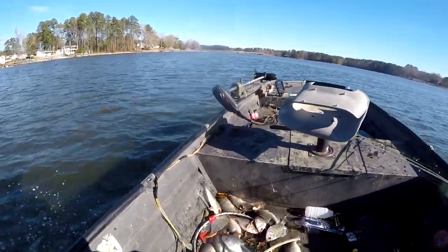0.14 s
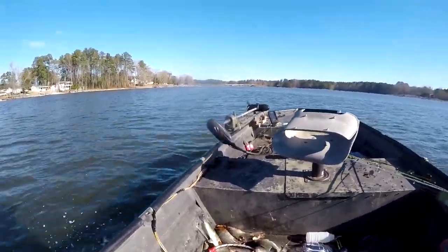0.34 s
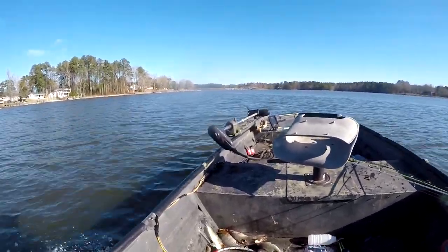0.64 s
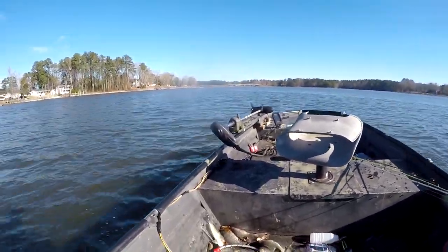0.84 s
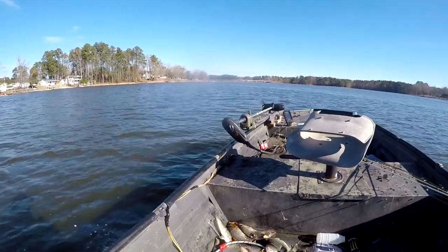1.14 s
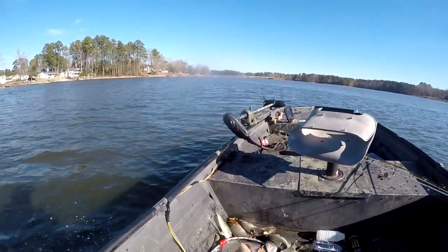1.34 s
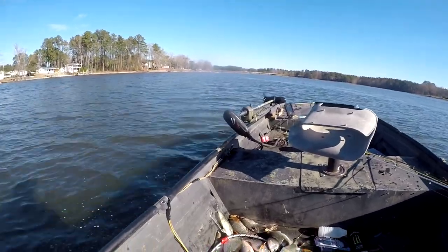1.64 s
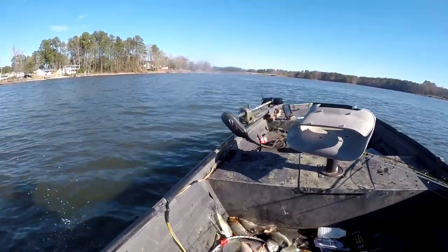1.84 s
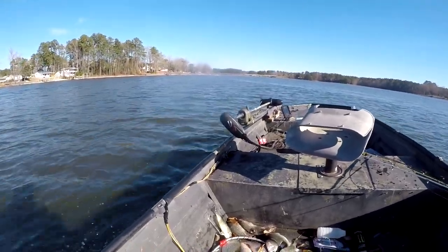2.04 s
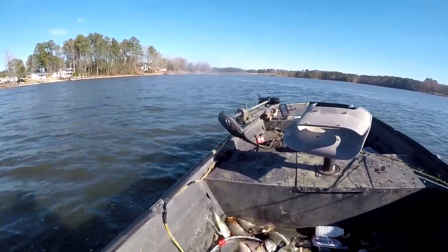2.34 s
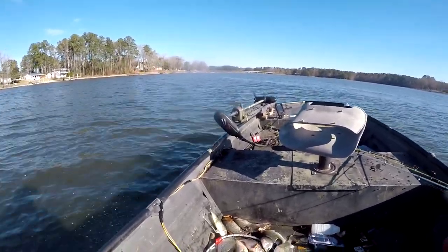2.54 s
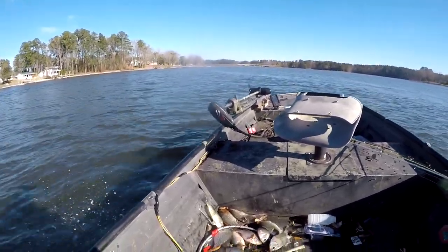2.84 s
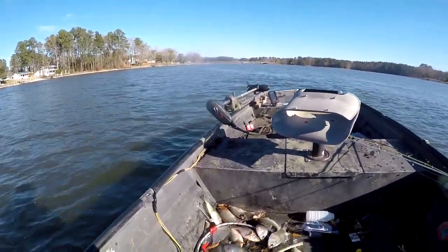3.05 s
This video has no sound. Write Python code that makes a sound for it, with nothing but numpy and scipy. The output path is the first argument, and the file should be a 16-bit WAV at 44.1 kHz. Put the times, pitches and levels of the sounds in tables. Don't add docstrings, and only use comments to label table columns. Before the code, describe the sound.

Close onboard sound of an outboard motor, buzzing and raspy at first, then its drone weakening as hull knocks crowd together, cowl clatter grows and low wind gusts hit the microphone; outdoors on a lake.

```python
import sys
import numpy as np
from scipy import signal
from scipy.fft import rfft, irfft
from scipy.io import wavfile
from scipy.ndimage import uniform_filter1d, minimum_filter1d

SR = 44100
rng = np.random.default_rng(int(sys.argv[2]) if len(sys.argv) > 2 else 0)


def gain_from_decibels(decibels):
    exponent = np.asarray(decibels, float) / 20
    return 10 ** exponent


def log_audio(samples):
    frames = np.atleast_2d(samples).T
    limited = np.clip(frames, -1, 1)
    pcm = np.round(limited * 32767).astype(np.int16)
    wavfile.write(sys.argv[1], SR, pcm)


N = 141120

# order, peak level/dB, share of the drone change, waver/dB
HUM = [
    (1, -22.5, -1.8, 4.5),
    (2, -10, 1.8, 0.66),
    (3, -28, 1.3, 2.5),
    (4, -7.5, 0.01, -0.35),
    (5, -32.5, -0.76, 0),
]
# t/s, drone change/dB, gust change/dB
TURN = [
    (0, 1.5, -1.5),
    (.35, -1, -0.5),
    (.9, .5, -0.5),
    (1.5, 0, -2.5),
    (1.75, -0.5, 1.5),
    (2.25, -1, -1),
    (2.5, -2, 2.5),
    (2.75, -3, -0.5),
    (3.2, -1.5, 2.5),
]
# t/s, exhaust change/dB, cowl change/dB
RASP = [
    (0, 2.5, -0.3),
    (.5, 2.5, -.5),
    (1, 1, -1),
    (1.7, -2, -.5),
    (2.2, 0.1, 0.2),
    (2.5, -0.5, 1.4),
    (2.7, 0.3, -0.5),
    (3.2, 0.3, 2),
]


def evened(x):
    return x / np.sqrt(np.mean(x ** 2) + 1e-20)


def curve(table, column):
    rows = np.array(table)
    return np.interp(np.arange(N) / SR, rows[:, 0], rows[:, column])


def wander(top_hz, count):
    size = N // 64 + 2
    z = rfft(rng.standard_normal((count, size)), axis=1)
    hz = np.fft.rfftfreq(size, 64 / SR)
    slow = irfft(z / (1 + (hz / top_hz) ** 2) * (hz > 0), size, axis=1)
    return np.array([evened(np.interp(np.arange(N) / 64, np.arange(size := len(s)), s)) for s in slow])


def noise(shape, patchy_db, size):
    frames, hz = N // (size // 4) + 5, np.fft.rfftfreq(size, 1 / SR)
    a, b, patches = rng.standard_normal((frames, len(hz), 3)).T
    patches = uniform_filter1d(patches, size=8, axis=0)
    patches = evened(uniform_filter1d(patches, size=8, axis=1))
    f, level = np.transpose(shape)
    colour = np.interp(np.log(hz + 1), np.log(f + 1), level, left=-100, right=-100)
    z = (a + 1j * b) * gain_from_decibels(colour[:, None] + patchy_db * patches)
    return evened(signal.istft(z, nperseg=size, noverlap=size * 3 // 4)[1][:N])


def band(lo_hz, hi_hz, count):
    sos = signal.butter(4, [lo_hz, hi_hz], "bandpass", fs=SR, output="sos")
    return evened(signal.sosfilt(sos, rng.standard_normal((count, 2000))))


def crank():
    # t/s, f/Hz (crank turns per second)
    speed = [(0, 77.6), (.35, 77.93), (.6, 78.3), (.9, 79.1), (1.2, 79.66), (1.5, 80.36), (1.75, 80.72),
             (2.0, 80.97), (2.5, 81.63), (2.95, 82.45), (3.2, 82.7)]
    start_angle, wobble_hz = 1.086, .15
    turns_per_s = curve(speed, column=1) + wobble_hz * wander(14, count=1)[0]
    return start_angle + 2 * np.pi * np.cumsum(turns_per_s) / SR


def hum(angle):
    pulse_lag = -2.8
    drone, waver = curve(TURN, column=1), wander(12, count=len(HUM))
    out = np.zeros(N)
    for (order, db, share, waver_db), w in zip(HUM, waver):
        out += gain_from_decibels(db + share * drone + waver_db * w) * np.cos(order * angle + pulse_lag)
    return out


def whine(angle):
    # order, level/dB
    orders = [(1, -10), (2, -3), (3, -18), (4, 0), (5, -23), (6, -35.5), (7, -36), (8, -36.5), (9, -33),
              (10, -38.5), (11, -41.5), (12, -42.5), (13, -49), (14, -46), (15, -46.5), (16, -42),
              (17, -48.5), (18, -38), (19, -47), (20, -41.5), (21, -53.5), (22, -40), (23, -44.5),
              (24, -43), (25, -43), (26, -55.5), (27, -49), (28, -49.5), (29, -40.5), (30, -48.5)]
    whine_db, waver_db, slip = -11, 3, .5
    upper = orders[len(HUM):]
    fade, drift = wander(8, count=2 * len(upper)).reshape(len(upper), 2, N).swapaxes(0, 1)
    start = rng.uniform(0, 2 * np.pi, len(upper))
    out = np.zeros(N)
    for i, (order, db) in enumerate(upper):
        rough = curve(RASP, column=2 if order > 13 else 1)
        level = whine_db + db + 1.1 * rough + waver_db * fade[i]
        out += gain_from_decibels(level) * np.cos(order * angle + start[i] + slip * drift[i])
    return out


def exhaust(angle):
    # f/Hz, level/dB per Hz
    jet = [(380, -32), (450, 3), (520, -3.5), (720, 0.5), (900, -8.5), (1050, -15.5), (1400, -31)]
    # f/Hz, level/dB per Hz
    clatter = [(700, -15), (1000, 1), (1450, -1.5), (1700, -1), (2050, 0.5), (2400, -6), (2700, -6),
               (2950, -23.5)]
    exhaust_db, exhaust_depth = -41, 0.49
    cowl_db, cowl_depth = -43, 0.12
    flutter = wander(25, count=2)
    low = (1 + exhaust_depth * np.cos(2 * angle)) * noise(jet, patchy_db=0.5, size=1024)
    high = (1 + cowl_depth * np.cos(2 * angle - 1.5)) * noise(clatter, patchy_db=0.1, size=512)
    low_level = exhaust_db + curve(RASP, column=1) + 0.28 * flutter[0]
    high_level = cowl_db + curve(RASP, column=2) + 0.3 * flutter[1]
    return gain_from_decibels(low_level) * low + gain_from_decibels(high_level) * high


def wind():
    # f/Hz, level/dB per Hz
    buffet = [(20, -22.5), (45, -7.5), (75, 1.5), (125, 2.5), (230, -4.5), (400, -11.5), (440, -26.5),
              (600, -46)]
    wind_db = -16
    slow, quick = wander(6.4, count=1)[0], wander(25, count=1)[0]
    level = wind_db + curve(TURN, column=2) + .7 * slow + 1.4 * quick
    return gain_from_decibels(level) * noise(buffet, patchy_db=1.0, size=2048)


def knocks():
    # t/s, peak level/dB, top pitch f/Hz, spit level/dB
    impacts = [(.0566, -31, 1700, -20), (.1625, -23.5, 1700, -10), (.2785, -27.5, 1800, -22),
               (.7805, -33, 1750, -22), (.9654, -26.5, 1800, -21), (1.1115, -27, 1900, -21),
               (1.2186, -32, 1750, -20), (1.3391, -34, 1750, -18), (1.6572, -29, 1750, -22),
               (1.7436, -26, 1700, -26), (2.0015, -25.5, 1850, -18), (2.2044, -32, 1740, -16),
               (2.5173, -31, 1800, -22), (2.6075, -27, 1900, -22), (2.7158, -24, 1800, -21),
               (2.8145, -23.5, 1800, -23), (2.9238, -24, 1800, -20), (3.018, -31, 1750, -21),
               (3.1294, -35, 1750, -25)]
    knock_db, soft_s = -2.2, .0012
    glide, glide_s, rise_s, plop_t60_s = .51, .003, .002, .023
    tick_db, tick_hz, tick_t60_s = -1.5, 2340, 0.0051
    slap_db, slap_t60_s, spit_t60_s = -10, 0.061, .04
    t, out = np.arange(2000) / SR, np.zeros(N + 2000)
    soft = np.sin(np.pi / 2 * np.minimum(t / soft_s, 1)) ** 2
    slaps, spits = band(750, 2300, count=len(impacts)), band(3500, 4250, count=len(impacts))
    for (s, db, top_hz, spit_db), slap, spit in zip(impacts, slaps, spits):
        hz = .95 * top_hz * (1 - glide * np.exp(-t / glide_s))
        swell = (1 - np.exp(-t / rise_s)) * gain_from_decibels(-60 * t / plop_t60_s)
        plop = swell * np.sin(2 * np.pi * np.cumsum(hz) / SR)
        tick = gain_from_decibels(tick_db - 60 * t / tick_t60_s) * np.sin(2 * np.pi * tick_hz * t)
        wet = gain_from_decibels(slap_db - 60 * t / slap_t60_s) * slap
        wet += gain_from_decibels(spit_db - 60 * t / spit_t60_s) * spit
        knock = soft * (plop / abs(plop).max() + tick + wet)
        out[round(s * SR):][:len(t)] += gain_from_decibels(db + knock_db) * knock
    return out[:N]


def water():
    # f/Hz, level/dB per Hz
    hull_flow = [(2000, -14), (2700, -2.5), (3100, -1), (3700, 0), (6200, -3.5), (7000, -16.5),
                 (9000, -27.5)]
    # f/Hz, level/dB per Hz
    droplets = [(6600, -24.5), (7200, -4.5), (10300, -8), (10650, -22), (11250, -20), (12300, 1.5),
                (14200, -3), (15400, -11)]
    # t/s, spray level/dB
    splashes = [(.03, -59.5), (.4, -68), (.6, -66.5), (.68, -61), (.75, -65), (.83, -61.5), (.92, -67.5),
                (1.01, -61), (1.23, -68), (1.34, -62), (1.45, -68.5), (1.55, -65.5), (1.75, -69.5),
                (2.2, -67), (2.5, -68), (2.64, -61.5), (2.88, -68), (2.97, -66)]
    rush_db, rush_follow = -49, 0.48
    splash, flicker = curve(splashes, column=1), wander(44, count=1)[0]
    rush_level = rush_db + rush_follow * (splash - splash.mean()) + 0.55 * flicker
    rush = gain_from_decibels(rush_level) * noise(hull_flow, patchy_db=0.0, size=512)
    return rush + gain_from_decibels(splash - 0.5 + 1.7 * flicker) * noise(droplets, patchy_db=1.6, size=512)


def scene():
    angle = crank()
    motor = hum(angle) + whine(angle) + exhaust(angle)
    return (motor + wind() + knocks() + water())[None]


def low_pass(x):
    return signal.sosfilt(signal.butter(12, 15290, fs=SR, output="sos"), x)


def record(dry):
    peak = -minimum_filter1d(-abs(dry), size=301, axis=1)
    peak = uniform_filter1d(peak, size=301, axis=1)
    held = dry * np.minimum(1, 0.82 / peak) ** 0.86
    mix = held - held.mean() + .0017
    return low_pass(mix)


dry = scene()
out = record(dry)
log_audio(out)
```